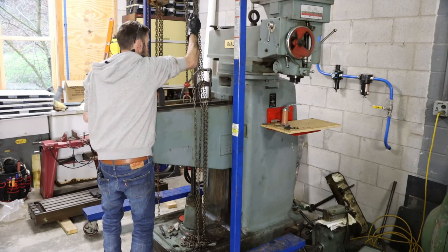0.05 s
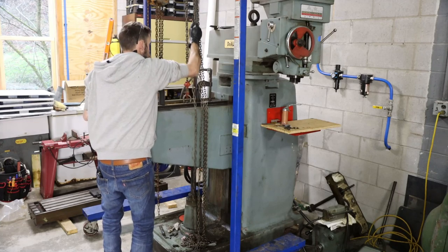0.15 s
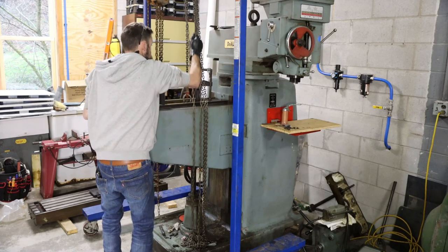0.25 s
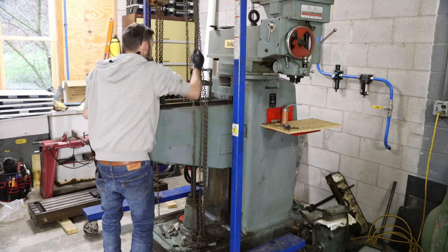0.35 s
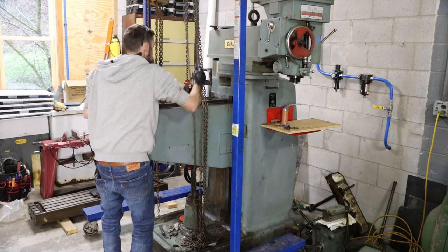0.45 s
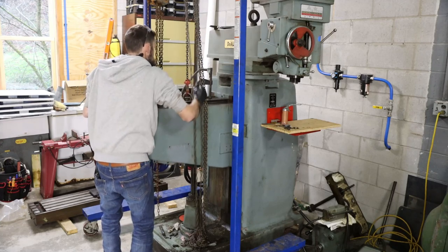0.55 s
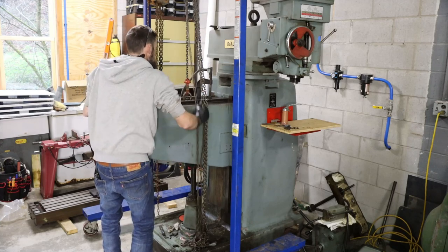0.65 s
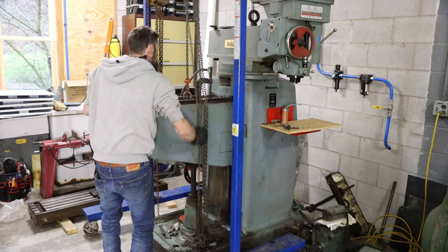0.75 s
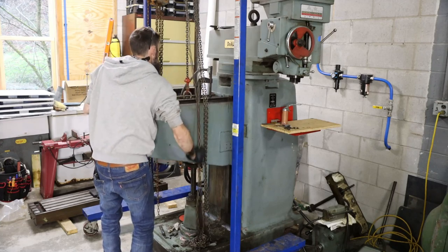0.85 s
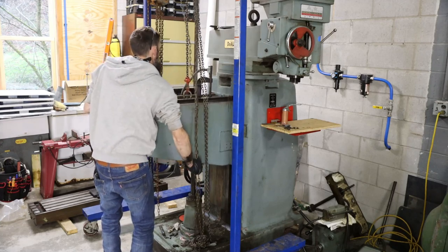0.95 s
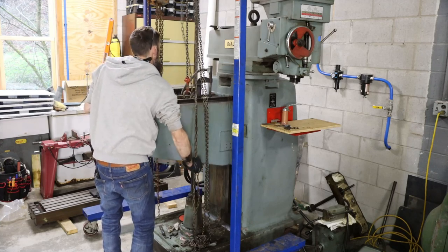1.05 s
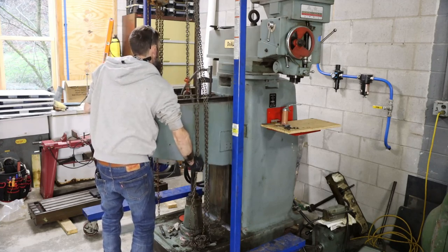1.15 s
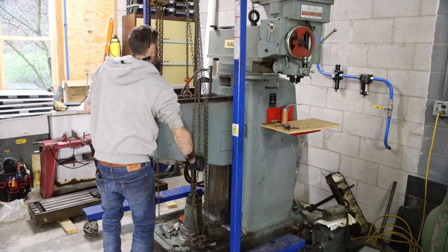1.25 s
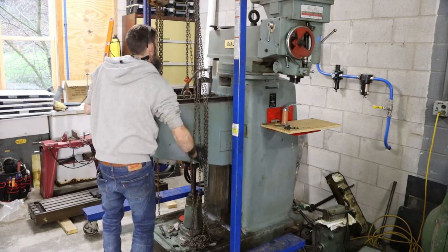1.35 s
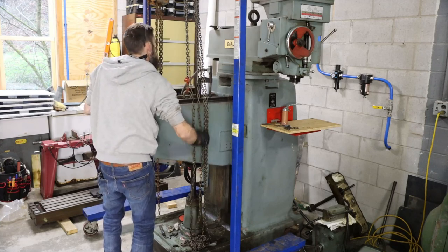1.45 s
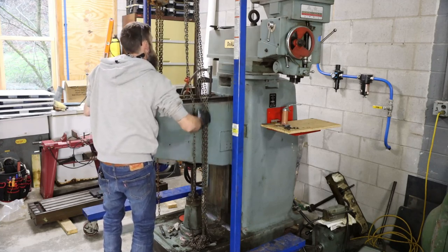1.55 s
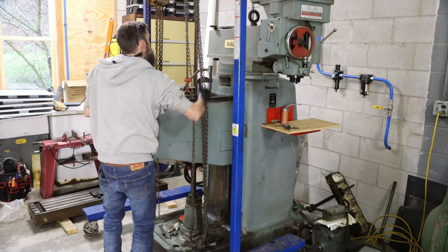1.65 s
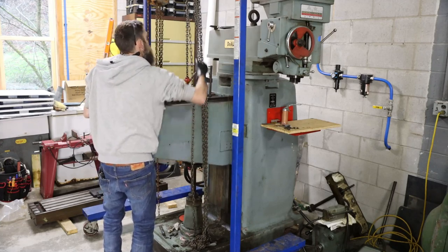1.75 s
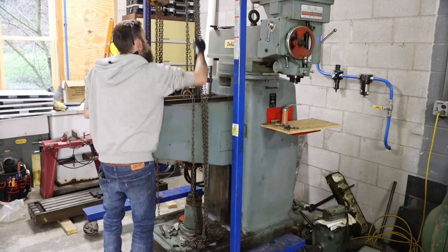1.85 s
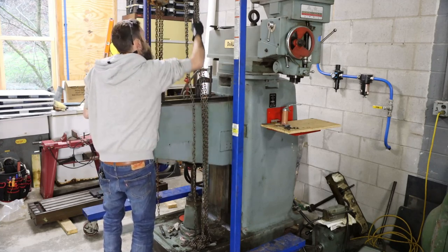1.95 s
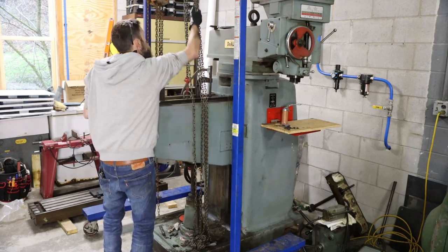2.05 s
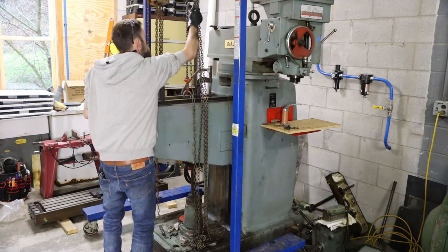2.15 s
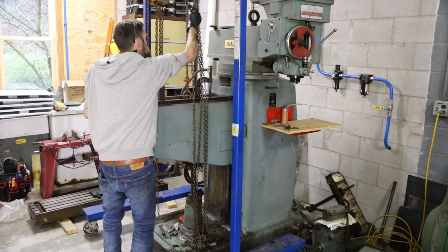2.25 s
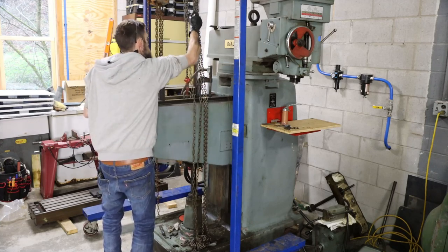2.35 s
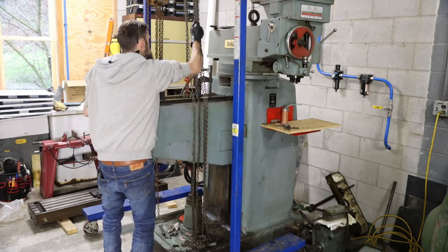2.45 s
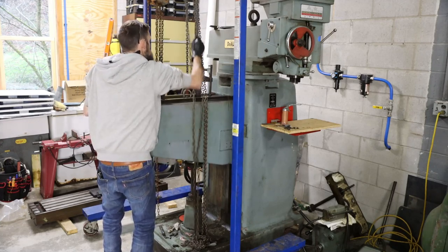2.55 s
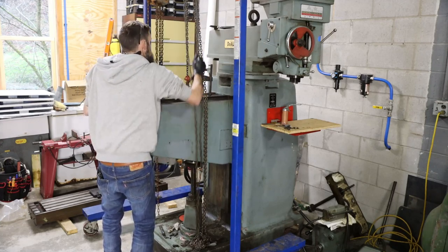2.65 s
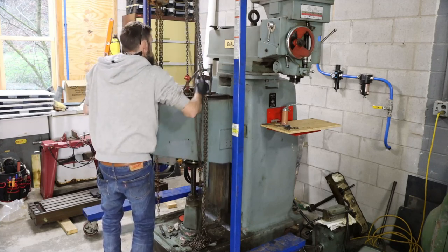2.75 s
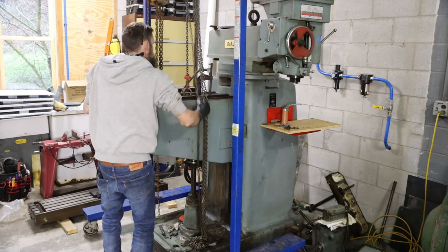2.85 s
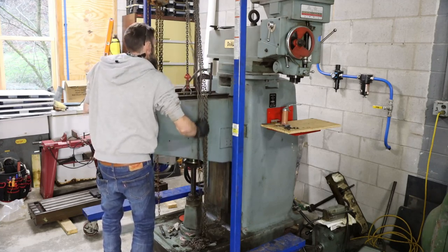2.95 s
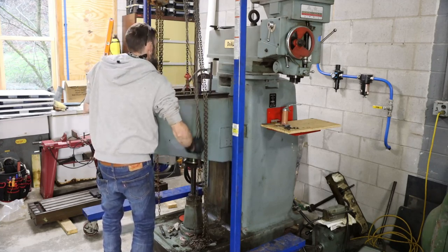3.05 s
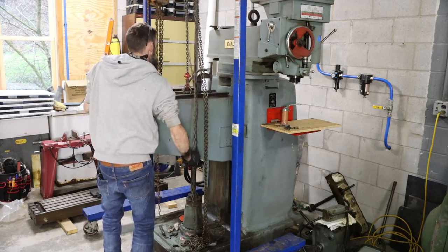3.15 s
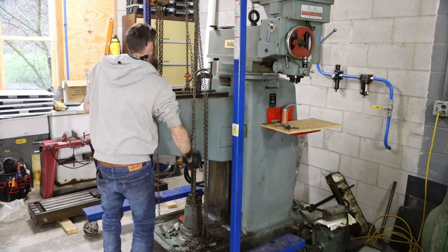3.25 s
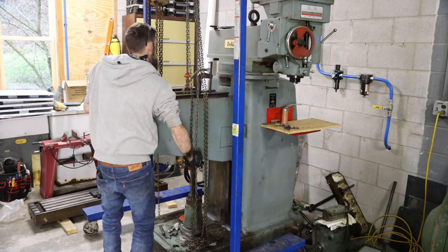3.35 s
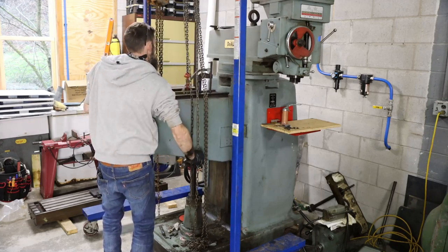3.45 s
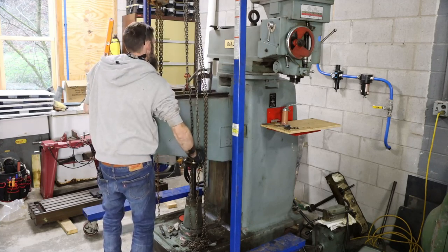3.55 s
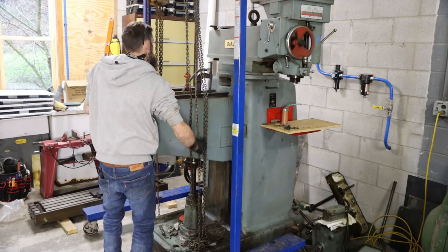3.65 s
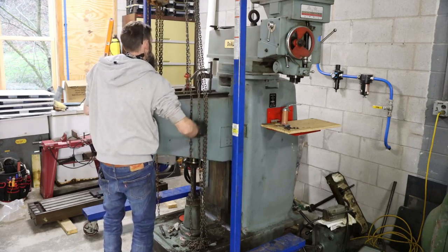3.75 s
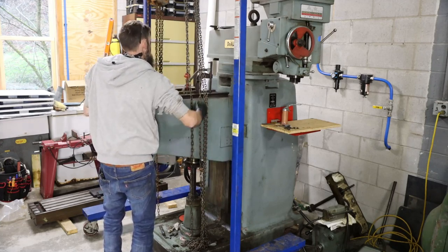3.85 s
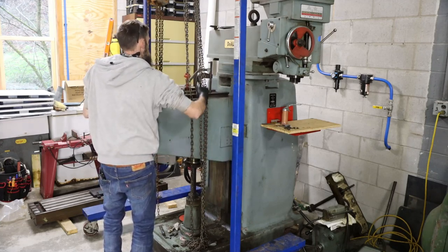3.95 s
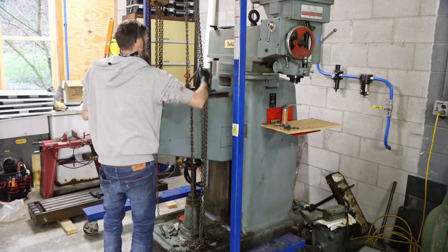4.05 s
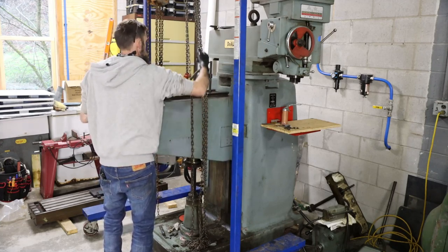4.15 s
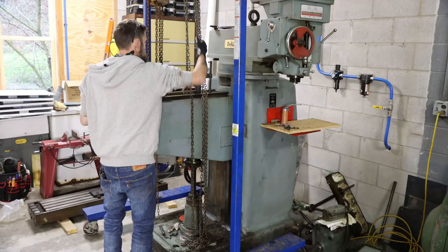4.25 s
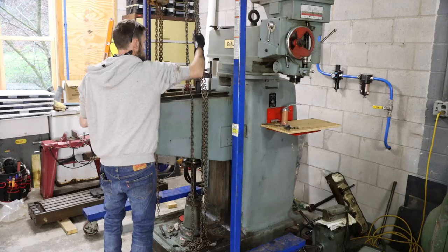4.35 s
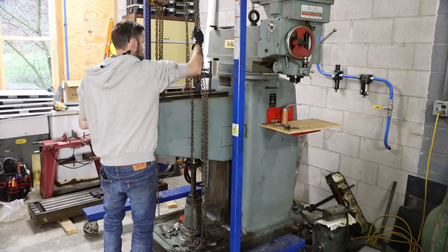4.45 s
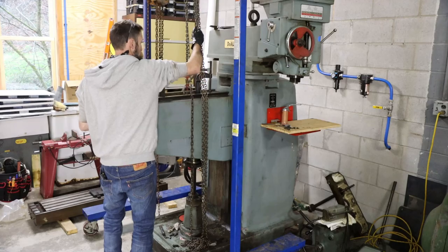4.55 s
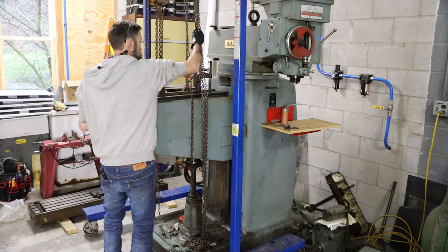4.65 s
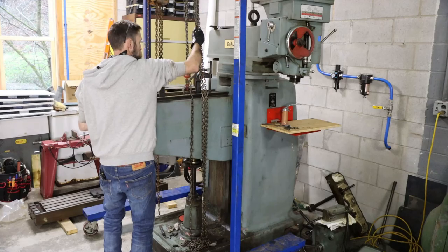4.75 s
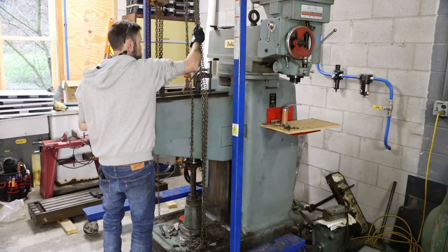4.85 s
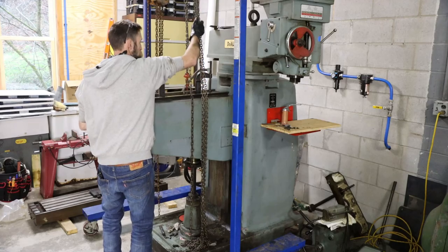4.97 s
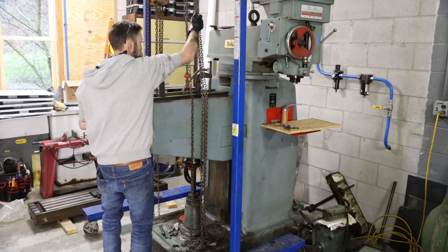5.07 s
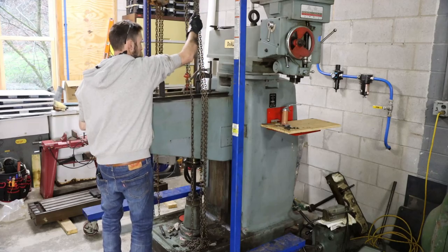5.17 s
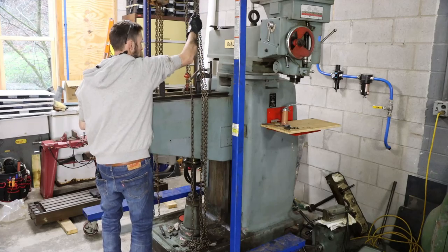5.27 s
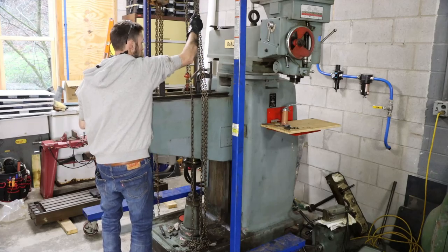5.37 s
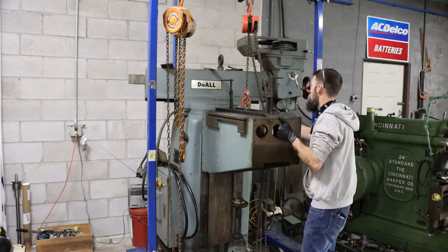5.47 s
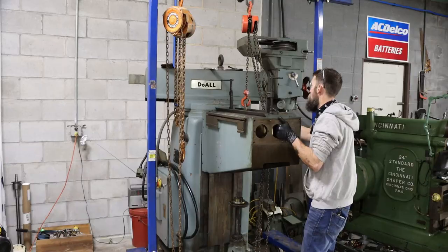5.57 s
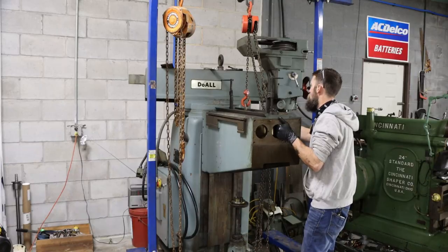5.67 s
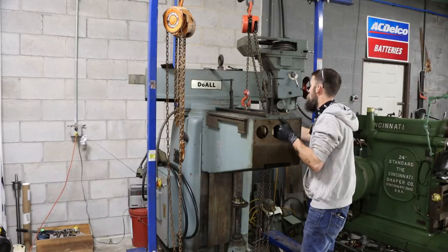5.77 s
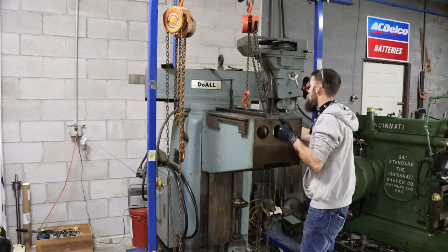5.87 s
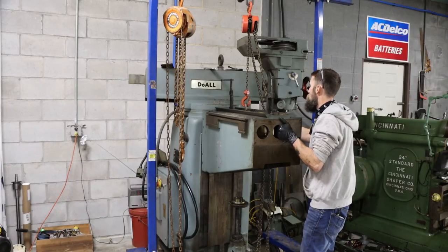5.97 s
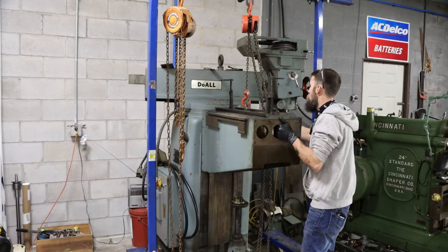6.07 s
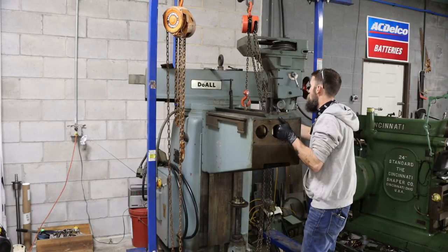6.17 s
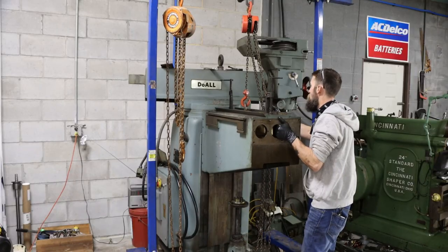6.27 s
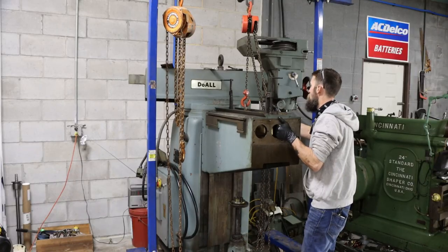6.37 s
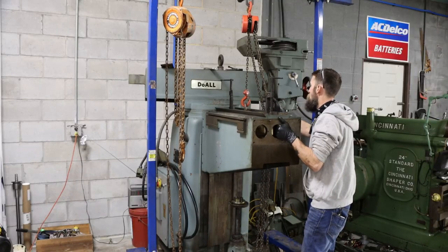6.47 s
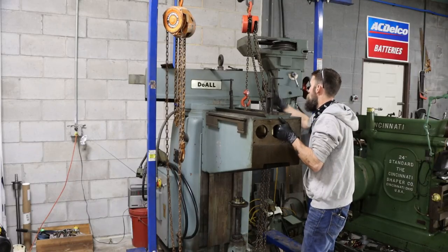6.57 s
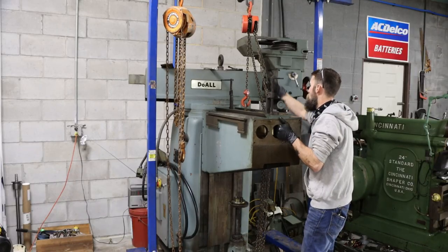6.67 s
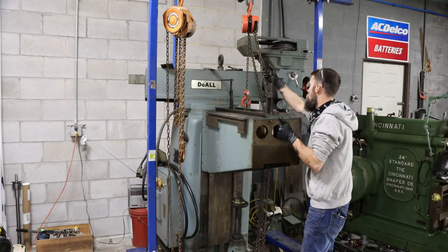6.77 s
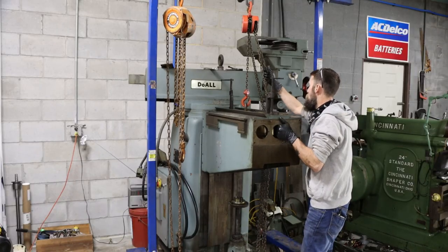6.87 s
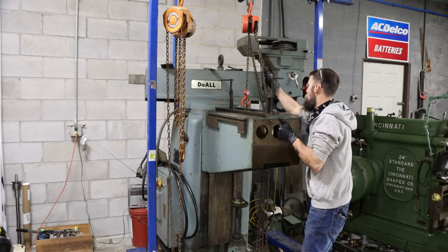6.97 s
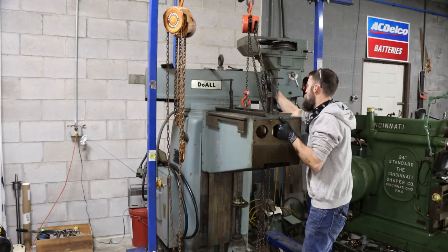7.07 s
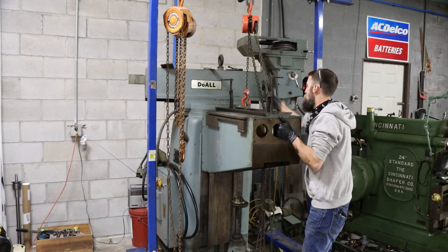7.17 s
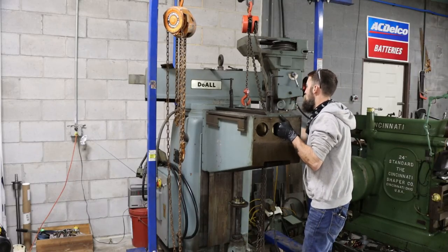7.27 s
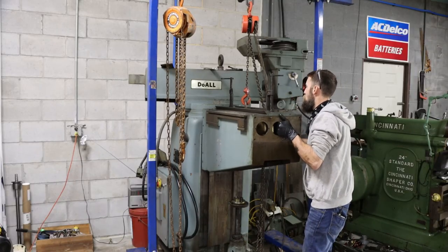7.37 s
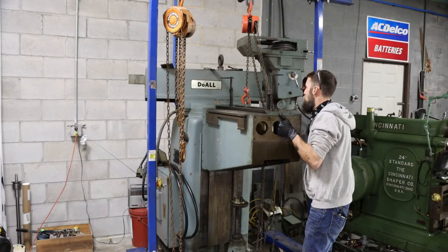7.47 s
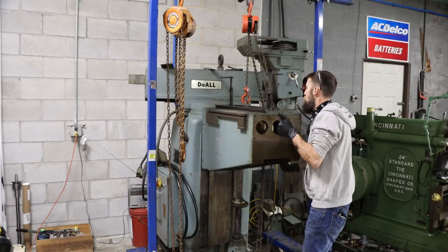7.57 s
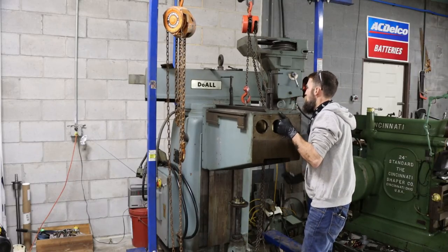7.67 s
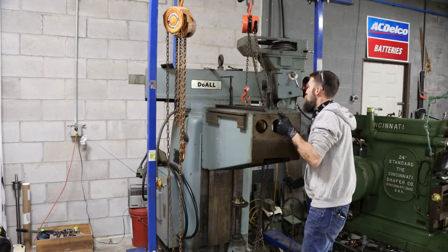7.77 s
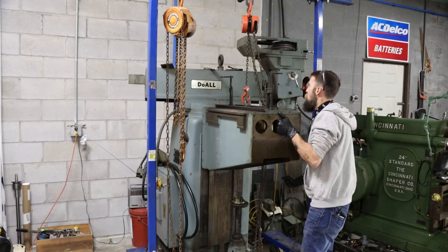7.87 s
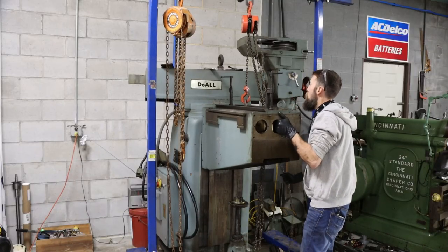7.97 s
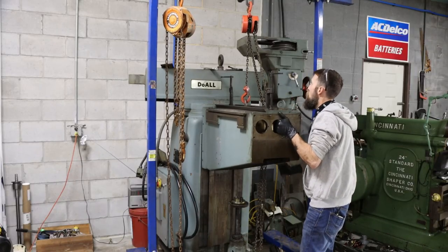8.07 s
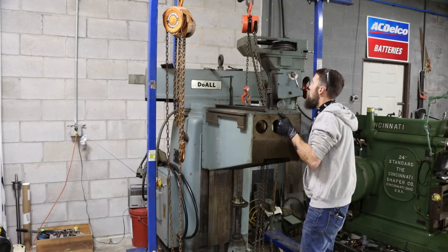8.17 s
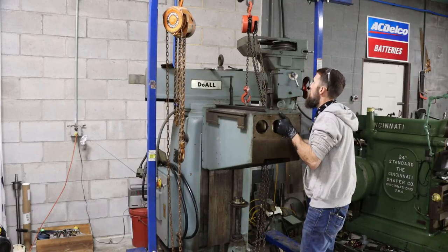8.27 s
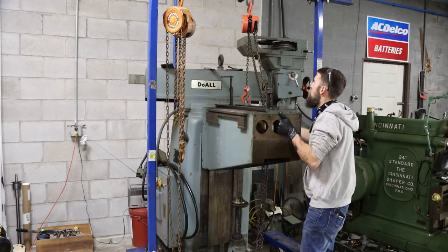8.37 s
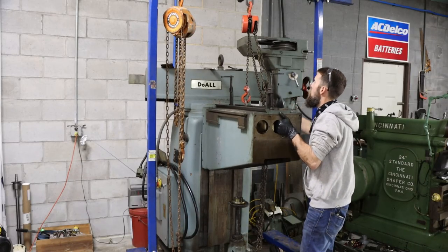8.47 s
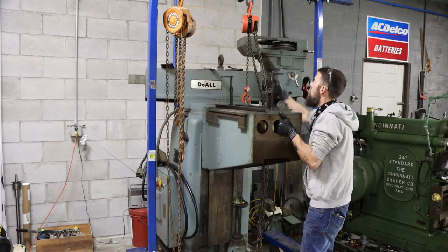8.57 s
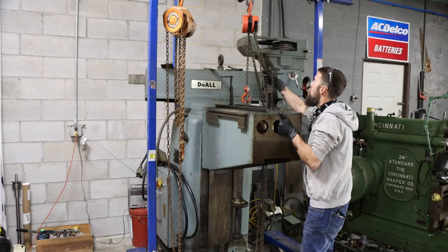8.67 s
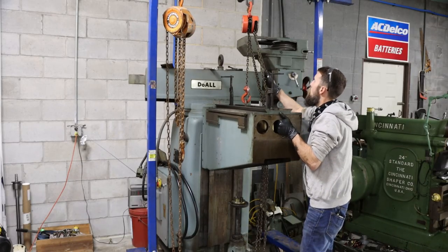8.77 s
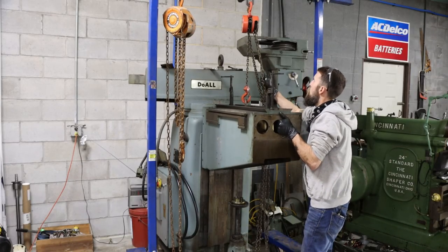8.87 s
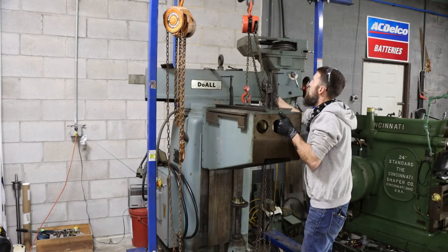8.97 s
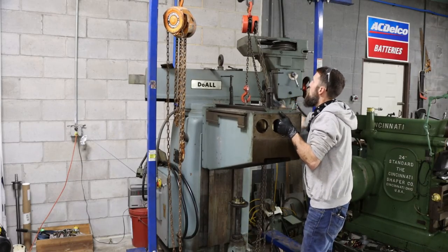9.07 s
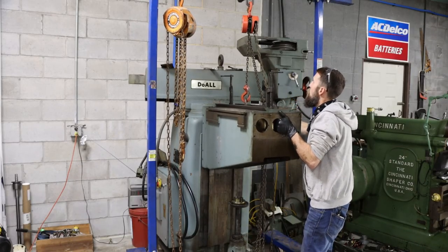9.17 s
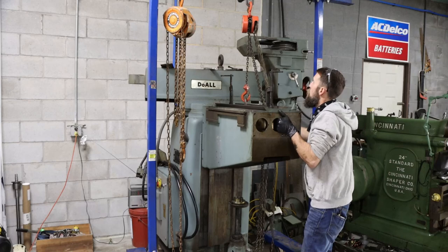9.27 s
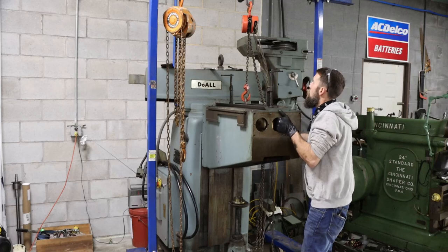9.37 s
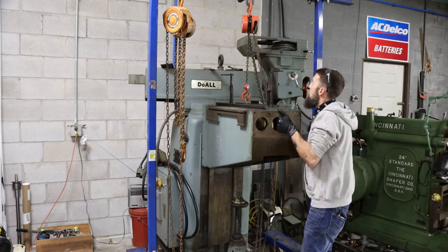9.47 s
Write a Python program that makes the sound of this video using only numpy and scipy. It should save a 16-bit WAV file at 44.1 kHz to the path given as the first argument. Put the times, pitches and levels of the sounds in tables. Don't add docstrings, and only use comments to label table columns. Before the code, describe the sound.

Close, bright steel chain noise in a hard-walled machine shop with a short echo. Two long bursts of ratcheting links speed up and slow down over a humming gear case and low beam groan. Leathery sliding, small clinks and iron knocks fill the gaps. A loud dull thud lands midway, a gentler one with a wavering ring follows, then a brief third rattle, heavier knocks, and a last uneven rattle still going at the end.

```python
import sys
import numpy as np
from scipy import signal
from scipy.fft import rfft, irfft
from scipy.io import wavfile
from scipy.ndimage import uniform_filter1d, map_coordinates

SR = 44100
rng = np.random.default_rng(int(sys.argv[2]) if len(sys.argv) > 2 else 0)


def transcribe(signal):
    frames = np.atleast_2d(signal).T
    limited = np.clip(frames, -1, 1)
    pcm = np.round(limited * 32767).astype(np.int16)
    wavfile.write(sys.argv[1], SR, pcm)


def elevation(decibels):
    levels = np.asarray(decibels, float)
    return 10 ** (levels / 20)


N = 419832
SIDE_VIEW_S = 5.47


def unit(x):
    return x / np.sqrt(np.mean(x ** 2))


def noise():
    return rng.standard_normal(N)


def spikes(times, db):
    out = np.zeros(N)
    index = np.minimum(np.asarray(times) * SR, N - 1).astype(int)
    np.add.at(out, index, elevation(np.asarray(db)))
    return out


def colour(x, points):
    size = 4096
    hz, db = np.transpose(points)
    bins = np.fft.rfftfreq(size, 1 / SR)
    log_gain = np.log(elevation(np.interp(np.log(bins + 1), np.log(hz), db)))
    cepstrum = irfft(log_gain)
    cepstrum[1:size // 2] *= 2
    cepstrum[size // 2 + 1:] = 0
    response = irfft(np.exp(rfft(cepstrum)))
    return signal.fftconvolve(x, response / np.sqrt(np.sum(response ** 2)))[:N]


def no_bass(x, hz):
    return signal.sosfilt(signal.butter(3, hz, "high", fs=SR, output="sos"), x)


def mode(x, hz, t60):
    r = np.exp(-np.log(1000) / (t60 * SR))
    w = 2 * np.pi * hz / SR
    return signal.lfilter([0, r * np.sin(w)], [1, -2 * r * np.cos(w), r * r], x)


def ring(x, modes):
    return sum(elevation(db) * mode(x, hz, t60) for hz, db, t60 in modes)


def resonate(x, peaks):
    out, power = 0, 0
    for hz, width, db in peaks:
        t60 = np.log(1000) / (np.pi * width)
        out = out + elevation(db) * 2 * np.pi * width / SR * mode(x, hz, t60)
        power += elevation(db) ** 2 * width * np.pi / SR
    return out / np.sqrt(power)


def contacts(times, db, decay_s):
    bite = np.exp(-1 / (0.00022 * SR))
    fade = np.exp(-1 / (decay_s * SR))
    return signal.lfilter([1 - bite], np.convolve([1, -bite], [1, -fade]), spikes(times, db))


def scrape(rows, decay_s):
    return contacts(*np.transpose(rows), decay_s) * noise()


def grains(count, spread_db, decay_s):
    when, size = rng.random((count, 2)).T
    level_db = -spread_db * np.log(1 - 0.975 * size)
    return unit(contacts(when * N / SR, level_db, decay_s) * noise())


def pings(times, db, hz, spread, rise_s, decay_s):
    out = np.zeros(N + SR)
    t = np.arange(SR // 10) / SR
    shape = (1 - np.exp(-t / rise_s)) * np.exp(-t / decay_s)
    shape = shape / shape.max()
    chance = rng.uniform(-1.044, 1, (len(times), 2))
    for s, gain, (tune, turn) in zip(times, elevation(np.asarray(db)), chance):
        start = int(s * SR)
        pitch = hz * (1 + spread * tune)
        out[start:start + len(t)] += gain * shape * np.sin(2 * np.pi * pitch * t + np.pi * turn)
    return out[:N]


# (frequency [Hz], level [dB])
AIR_SPECTRUM = [(15, -20), (25, 1.5), (157, 4), (503, 1.5), (754, 1.5), (1190, -13.5), (1290, -2),
                (1650, -12.5), (2480, -12.5), (13200, -24), (16000, -33.5)]


def still_air():
    side = np.arange(N) > SIDE_VIEW_S * SR
    return elevation(-56.5 - 2.5 * side) * colour(noise(), AIR_SPECTRUM)


def shop(x):
    low_t60_s, high_t60_s = 0.53, 0.13
    t = np.arange(SR) / SR
    a, b = rng.standard_normal((2, SR))
    low = 2.06 * signal.lfilter([0.2], [1, -0.8], a)
    tail = low * elevation(-60 * t / low_t60_s) + b * elevation(-60 * t / high_t60_s)
    tail = tail * np.clip(t / 0.0069 - 0.4, 0, 1)
    return elevation(-9) * signal.fftconvolve(x, tail / np.sqrt(np.sum(tail ** 2)))[:N]


# (time [s], level [dB])
BEAM_STRAIN = [
    (.32, -44),
    (2.62, -46.5),
    (3.5, -60),
    (9.05, -60),
]
# (frequency [Hz], width [Hz], level [dB])
BEAM_MODES = [(70.3, 40, -7), (142, 31, 10), (189, 50, -2)]


def gantry():
    t = np.arange(N) / SR
    strain_s = 0.15
    strain = sum(elevation(db - 9 * ((t - s) / strain_s) ** 2) for s, db in BEAM_STRAIN)
    return resonate(noise() * strain, BEAM_MODES)


# (loudest at [s], swell [s], fade [s], level [dB], top mode relative [dB])
GLOVE_SLIDES = [(1.1, 0.06, 0.17, -39.5, -25), (1.84, 0.32, 0.31, -39.5, -32),
                (3.38, 0.055, .2, -42, -24.5), (4.12, 0.36, 0.34, -41, -32),
                (4.551, 0.046, 0.22, -60.5, -23.5), (5.06, 0.13, 0.12, -49, -28),
                (5.579, 0.099, 0.098, -56, -18), (6.25, 0.16, 0.071, -57, -20.5),
                (6.68, 0.22, 0.23, -45, -36), (7.08, 0.035, 0.13, -50, -21),
                (7.98, 0.087, 0.63, -48.5, -19), (8.34, 0.028, 0.018, -45.5, 3.5),
                (8.5, 0.13, 0.26, -41, -25), (8.97, 0.041, 0.099, -48.5, -27)]


def slides():
    t = np.arange(N) / SR
    gain = []
    for s, swell, fade, db, _ in GLOVE_SLIDES:
        away = (t - s) / np.where(t < s, swell, fade)
        gain.append(elevation(db - 11.5 * away ** 2))
    gain = np.array(gain)
    return gain.sum(axis=0), elevation(np.array(GLOVE_SLIDES)[:, 4]) @ gain


# (frequency [Hz], level [dB])
GLOVE_SPECTRUM = [(880, -48.5), (1500, -0.5), (2610, 1.5), (3220, 3), (4690, 8), (6180, 5), (10000, 3.5),
                  (13900, -4.5), (16000, -9)]


def glove(hiss, top):
    held = np.repeat(rng.standard_normal(N // 400 + 1), 400)[:N]
    catch = uniform_filter1d(held, size=300)
    rub = elevation(0.5 + 1.2 * catch) * grains(count=20000, spread_db=5.0, decay_s=0.0043)
    return colour(hiss * rub, GLOVE_SPECTRUM) + resonate(top * rub, [(15200, 550, 0)])


# (frequency [Hz], width [Hz], level [dB])
CASE_BEHIND = [(393, 160, -2.5), (655, 60, -1.5), (840, 36, -4), (1045, 87, 2.5), (1327, 26, -8),
               (1609, 78, -1.5), (1915, 33, -13.5)]
# (frequency [Hz], width [Hz], level [dB])
CASE_SIDE = [(381, 50, 4), (698, 20, 8.5), (823, 59, 8.5), (1026, 250, 3.5), (1132, 144, 1), (1607, 35, 2),
             (2277, 68, -16)]


def housing(x):
    behind = np.arange(N) < SIDE_VIEW_S * SR
    return resonate(x * behind, CASE_BEHIND) + resonate(x * ~behind, CASE_SIDE)


# (time [s], peak [dB], link ring relative [dB])
LINK_TAPS = [(0.073, -40.5, 2.5), (1.1738, -25.5, 8.5), (1.2115, -42, 12), (1.5005, -48.5, 15),
             (1.5663, -27.5, -11), (2.0304, -36.5, 0), (2.108, -20.5, 3), (2.204, -26, 4),
             (2.273, -43, 11.5), (3.4415, -14.5, -4.5), (3.468, -11, -4), (5.492, -34.5, -1),
             (5.652, -35, 4), (5.9653, -42, -5), (5.997, -40.5, -10.5), (6.149, -40, -9),
             (6.192, -33, -9.5), (6.8103, -40.5, 2), (7.0285, -34, -20), (7.9193, -27.5, 9.5),
             (7.976, -12, -19), (8.0444, -19.5, -1.5), (8.088, -30, -3), (8.198, -23.5, -16),
             (8.8467, -48.5, 13.5), (8.9432, -34, -3),
             (0.1269, -41, 11), (0.176, -27.5, 10), (0.2079, -27, 12), (6.0155, -40, -15),
               (6.588, -41, 3), (7.074, -37, -4), (7.2558, -2.5, -3.5), (7.930, -22.5, 8),
               (7.995, -18.5, -14.5), (8.039, -33, 9.5), (8.082, -25, -7), (8.327, -24, -14),
               (8.9185, -42, -6), (8.974, -27.5, 0), (8.99, -29, -4)]
# (frequency [Hz], width [Hz], level [dB])
LINK_MODES = [(2973, 130, -1.5), (3306, 170, -2.5), (3890, 250, -4), (4846, 210, 2), (5160, 290, 2),
              (5850, 450, -1), (6260, 140, -5), (7950, 170, -6.5), (9100, 360, -15), (11400, 540, -23),
              (14880, 300, -24.5)]
# (frequency [Hz], level [dB])
TICK_SPECTRUM = [(1200, -44.5), (2400, -12), (4000, 1.5), (6000, -3.5), (8000, 5), (11600, 2.5),
                 (13500, -6), (16000, -10)]


def link_taps():
    s, db, ring_db = np.transpose(LINK_TAPS)
    click = colour(scrape([*zip(s, db)], 0.0056), TICK_SPECTRUM)
    blow = scrape([*zip(s, db + ring_db + 9.5)], 0.0041)
    return click + resonate(blow, LINK_MODES + [(6680, 180, 0.88)])


# (time [s], peak [dB], deep knock relative [dB])
IRON_KNOCKS = [(0.074, -22, -27), (1.174, -12.5, 1), (1.783, -22.5, -30), (1.992, -20.5, -39),
               (2.028, -23, -26), (2.107, -20, -26), (2.205, -17, -22.5), (2.274, -19, -17),
               (2.409, -21.5, -16), (3.465, -11.5, 3), (5.492, -31.5, -2.5), (5.531, -33, -17),
               (5.576, -26, -20), (5.65, -24, -28), (1.501, -22, -16), (5.968, -37.5, -5),
               (6.696, -28, -12), (6.798, -25.5, -2), (6.94, -25.5, -5), (6.959, -24.5, -5),
               (7.097, -24, -24), (7.2, -14, -39), (7.255, -9.5, -29.5), (7.668, -4, -17),
               (7.918, -17, 4.5), (8.045, -11, -18), (8.35, -27.5, -7), (8.558, -24, -22),
               (8.613, -22, -22), (8.842, -27.5, 5)]
# (time [s], level [dB])
STRAND_SWAY = [(0, -47), (1.15, -42), (1.38, -35.5), (1.64, -44), (1.95, -59), (2.44, -60), (3.35, -36),
               (4.2, -45), (4.7, -58.5), (5.45, -55.5), (5.6, -45), (6.1, -73), (6.6, -50), (7.1, -50),
               (7.9, -31), (8.3, -44.5), (8.62, -35), (9.0, -40.5)]
# (frequency [Hz], level [dB])
RUMBLE_SPECTRUM = [(25, -37), (150, -11), (260, -27), (340, -20.5), (700, 2.5), (1030, 7), (1380, -6.5),
                   (1640, 5.5), (2350, -7), (2970, -2), (4000, -11), (6000, -35)]


def strand_knocks():
    s, db, deep_db = np.transpose(IRON_KNOCKS)
    sway_db = np.interp(np.arange(N) / SR, *np.transpose(STRAND_SWAY))
    rub = elevation(sway_db) * grains(count=1500, spread_db=5.0, decay_s=0.017)
    blow = scrape([*zip(s, db)], 0.0049) + rub
    table = resonate(scrape([*zip(s, db + deep_db)], 0.0061),
                     [(380, 100, -2.0), (500, 170, -3.5), (643, 71, 2.0), (770, 110, -9.0)])
    return elevation(-6.0) * housing(blow) + elevation(-13.5) * colour(blow, RUMBLE_SPECTRUM) + elevation(-4.5) * table


def loose_chain():
    return no_bass(elevation(-10.0) * link_taps() + strand_knocks(), 514)


# (time [s], peak [dB], brightness [dB per octave])
FRAME_BLOWS = [
    (1.331, -26.5, 2.5),
    (1.802, -24.5, 0.5),
    (3.235, -21.5, -18.5),
    (3.459, -23, 8),
    (3.725, -21, 3),
    (4.003, -31, -0.5),
    (4.135, -39, 11.5),
    (4.797, -39, 0),
    (6.739, -31, 3),
    (6.444, -42, 0),
]
# (frequency [Hz], level [dB], t60 [s])
FRAME_MODES = [(571, 1.5, 0.36), (795, -21, 0.84), (1012, 0.5, 0.55), (1074, 6, 0.22), (1218, 1.5, 0.36),
               (1385, -6.5, 0.25), (1567, -4, 0.3), (1680, -3.5, 0.26), (1800, -12.5, 0.38),
               (2070, -10.5, 0.25), (2970, -17, 0.23)]
# (frequency [Hz], level [dB], t60 [s])
BRACKET_MODES = [(566.5, -42.5, 0.6), (1060, -48, 0.43), (1220, -43, 0.31), (1620, -49, .45),
                 (2080, -46, .08)]


def frame():
    s, db, bright = np.transpose(FRAME_BLOWS)
    rise = np.exp(-1 / (0.0071 * SR))
    rough = noise()

    def drag(level_db):
        return signal.lfilter([1 - rise], [1, -rise], contacts(s, level_db, 0.015)) * rough

    modes = elevation(-25.0) * ring(drag(db), FRAME_MODES)
    for hz, mode_db, t60 in FRAME_MODES:
        blow = spikes(s, db + mode_db + bright * np.log2(hz / 1000))
        modes = modes + mode(blow, hz, t60)
    modes = uniform_filter1d(modes, size=5)
    grating = resonate(drag(db + bright + 6), [(1130, 160, -11.5), (1770, 380, 4.0), (2730, 2100, 1.5)])
    tap = ring(spikes([4.797], [0]), BRACKET_MODES) + pings([4.138], [-36], 1680, 0, 0.0022, 0.028)
    return no_bass(elevation(-13.0) * modes + elevation(-11.0) * grating, 540) + tap


# (time [s], peak [dB])
LOAD_THUDS = [
    (4.215, -4),
    (6.2592, -12.5),
]
# (frequency [Hz], level [dB], t60 [s])
FIRST_THUD_MODES = [(174, -10, 0.67), (220, -0.5, 0.078), (238.5, -28.5, 1.73), (285, -16.5, 0.7),
                    (384, -24.5, 0.88), (560, -29, 1.3), (114, -19.5, 0.97), (673.8, -12, 0.89),
                    (862, -10, 0.13), (1134, -20, 0.36), (1380, -16, 0.4), (1698, -10, 0.16)]
# (frequency [Hz], level [dB], t60 [s])
SECOND_THUD_MODES = [(112.4, -7, 0.51), (210, -19, 0.76), (271.5, -16, 0.99), (333, -19, 0.92),
                     (384, -23.5, 0.82), (588, -16, 0.6), (1387, -18, 0.45)]
# (frequency [Hz], level [dB])
THUD_SPECTRUM = [(15, -40), (25, -1.5), (189, -8.5), (494, -16.5), (681, -17.5), (768, -22.5),
                 (1710, -38.5), (2300, -58), (6600, -110)]


def casting():
    out = 0
    for (s, db), modes in zip(LOAD_THUDS, (FIRST_THUD_MODES, SECOND_THUD_MODES)):
        envelope = contacts([s], [db - 17.0], 0.12) + contacts([s], [db - 8.5], 0.0086)
        shudder = envelope * noise()
        push = contacts([s], [db + 7.0], 0.00036) + elevation(-2.5) * shudder
        out = out + elevation(-35) * ring(push, modes) + colour(shudder, THUD_SPECTRUM)
    return no_bass(out, 112) + pings([LOAD_THUDS[0][0]], [-8.5], 190.3, 0, 0.0018, 0.011)


# (frequency [Hz], level [dB], t60 [s])
TWIN_MODES = [(675, -1, 2.0), (682.3, -1.4, 1.8)]


def throb():
    blow = spikes(*np.transpose(LOAD_THUDS[1:]))
    choke_db = 150 * (np.arange(N) / SR - LOAD_THUDS[1][0]) ** 2
    return elevation(-13.0 - choke_db) * (ring(blow, TWIN_MODES[:1]) - ring(blow, TWIN_MODES[1:]))


# (time [s], level [dB])
CASE_JOLTS = [(0.2155, -12.5), (0.2431, -17), (0.178, -14), (0.305, -32), (0.3622, -13), (0.3795, -13),
              (0.422, -14), (0.4983, -11), (0.5268, -15), (0.6217, -7.5), (0.662, -10), (0.7039, -15),
              (0.7389, -9.5), (0.841, -12.5), (0.9171, -19), (0.947, -13), (0.949, -17), (2.5376, -22),
              (2.56, -21), (2.7022, -11.5), (2.7278, -11.5), (2.7454, -10), (2.8116, -11.5), (2.8544, -7.5),
              (2.8725, -17), (2.8979, -7), (2.917, -16), (2.9776, -15), (3.022, -27), (3.0652, -14.5),
              (3.0787, -19), (3.0963, -17), (3.1622, -15), (3.2441, -25.5), (7.1999, -5), (7.2547, -12),
              (7.2965, -8.5), (7.318, -10), (7.4101, -11), (7.4735, -14), (7.488, -15), (7.5376, -26),
              (7.5726, -22), (7.6144, -10), (7.6497, -13), (7.667, -8.5), (7.683, -11), (7.7174, -18),
              (7.7518, -20), (9.008, -13.5), (9.0353, -17), (9.0945, -12.5), (9.1678, -17), (9.2349, -9.5),
              (9.2765, -13.5), (9.299, -20), (9.3377, -14), (9.4008, -14), (9.4386, -15), (9.4746, -16)]


def gear_case(rumble_db):
    shake = elevation(rumble_db - 6.5) * grains(count=2500, spread_db=4.0, decay_s=0.0051)
    shake = shake + elevation(-7.5) * no_bass(scrape(CASE_JOLTS, 0.0059), 280)
    case = elevation(-5.5) * housing(shake)
    case = case + elevation(-6.5) * pings(*np.transpose(CASE_JOLTS), 999, 0.12, 0.0013, 0.0076)
    return no_bass(case, 428) + elevation(0.87) * colour(shake, RUMBLE_SPECTRUM)


# (time [s], level [dB])
GUARD_SNAPS = [(0.6164, -9.5), (0.8312, -11), (0.949, -7.5), (2.5154, -4.5), (2.5378, -11), (2.5639, -12),
               (2.797, -9), (7.1995, -10.5), (7.2135, -11.5), (7.2629, -3), (7.3027, -15), (7.3354, -5.5),
               (7.3678, -11), (7.4575, -10), (7.4925, -10.5), (7.5229, -12), (7.5952, -16), (7.6674, -4.5),
               (7.7191, -12), (7.7662, -10), (9.034, -11.5), (9.2072, -13), (9.339, -11), (9.4562, -5.5)]


def guard_snaps():
    snaps = scrape(GUARD_SNAPS, 0.0032)
    return colour(snaps, TICK_SPECTRUM) + elevation(-5.0) * resonate(snaps, LINK_MODES[:3])


# (time [s], lower ring [dB], upper ring [dB])
FIRST_PULL_DROPS = [(0.228, -16.5, -28), (0.2525, -31, -28), (0.2815, -13, -2.5), (0.3053, -20.5, -27.5),
                    (0.3385, -23.5, -14), (0.3563, -12, -17.5), (0.3788, -11.5, -12), (0.394, -18.5, -5.5),
                    (0.41, -10, -14), (0.424, -7.5, -15.5), (0.445, -8.5, -6), (0.4578, -6.5, -11.5),
                    (0.481, -14, -15), (0.4989, -3, -6.5), (0.5242, -9, -19.5), (0.542, -9.5, -13.5),
                    (0.5675, -14.5, -8), (0.5802, -1, -11.5), (0.6062, -23, -10), (0.625, -13.5, -8.5),
                    (0.637, -18, -17), (0.6463, -13.5, -17.5), (0.66, -14, -6.5), (0.675, -14, -16),
                    (0.684, -18, -12), (0.701, -16, -1.5), (0.7154, -19, -17.5), (0.735, -15.5, -7.5),
                    (0.748, -16.5, -14), (0.757, -15, -16), (0.7688, -6, -9), (0.78, -11.5, -16),
                    (0.803, -12.5, -6.5), (0.823, -14, -16.5), (0.8534, -11, -17), (0.866, -4, -19.5),
                    (0.8899, -18.5, -13.5), (0.9026, 1, -14), (0.9238, -16, -9), (0.9376, -13, -15.5),
                    (0.954, -15.5, -23.5), (0.9632, -17.5, -10.5), (0.9957, -18, -8.5), (1.013, -12, -10)]
SECOND_PULL_DROPS = [(2.4528, -17, -28.5), (2.4867, -11, -24.5), (2.512, -7.5, -24.5), (2.537, -9.5, -20),
                     (2.5587, -15.5, -22), (2.592, -10, -22), (2.619, -23.5, -23), (2.64, -22, -21),
                     (2.664, -13, -9.5), (2.6844, -15.5, -16), (2.7044, -18, -13), (2.716, -18.5, -21),
                     (2.7251, -22, -16), (2.7427, -10, -16.5), (2.762, -15, -18), (2.779, -4, -13.5),
                     (2.796, -12, -13.5), (2.814, -8.5, -17.5), (2.8211, -14, -13.5), (2.8307, -13, -21),
                     (2.8478, -11.5, -20), (2.857, -4.5, -16.5), (2.88, -11.5, -17.5), (2.892, -11, -18.5),
                     (2.9006, -13.5, -18.5), (2.912, -5.5, -15.5), (2.9252, -21.5, -22.5),
                     (2.939, -12.5, -13.5), (2.9504, -7, -16.5), (2.979, -17, -15.5), (3.0003, -24.5, -21),
                     (3.018, -19.5, -14.5), (3.027, -20, -18), (3.0745, -6, -8.5), (3.0865, -12.5, -15),
                     (3.113, -23.5, -13), (3.136, -21.5, -11.5), (3.1497, -21, -18), (3.182, -14.5, -16),
                     (3.2003, -15, -7), (3.2102, -16, -18.5), (3.238, -25.5, -16.5)]
THIRD_PULL_DROPS = [(7.1988, -5, -18), (7.2144, -20, -18), (7.2332, -16, -19), (7.263, -14, -3),
                    (7.2796, -24, -12), (7.2861, -14, -21), (7.2968, -10, -21), (7.316, -11, -16),
                    (7.3351, -23, -9), (7.3505, -8, -13.5), (7.3666, -8.5, -13), (7.3798, -20, -12),
                    (7.389, -4.5, -5), (7.4114, -9, -10.5), (7.4358, -10, -16), (7.4643, -19, -19),
                    (7.4742, -5, -13), (7.4924, -11.5, -7), (7.5048, -12, -14.5), (7.5238, -20.5, -9),
                    (7.5391, -12, -20), (7.5529, -33, -25), (7.5862, -3, -13.5), (7.6095, -7, -6),
                    (7.622, -14.5, -23.5), (7.6507, -15.5, -15), (7.6604, -13, -18), (7.6687, -17, -13.5),
                    (7.6953, -35, -11.5), (7.7198, -15.5, -11), (7.7557, -12, -22), (7.7662, -9, -7),
                    (7.8066, -17, -25)]
LAST_PULL_DROPS = [(9.0047, -19.5, -34), (9.0373, -15, -35), (9.0523, -22, -30), (9.0825, -22, -29),
                   (9.1098, -14.5, -26), (9.165, -13, -19), (9.1839, -10, -8), (9.2093, -24, -22),
                   (9.2266, -15, -29.5), (9.2382, -10, -21), (9.2471, -11, -23), (9.2998, -5, -22),
                   (9.3173, -15, -28.5), (9.3426, -16, -25), (9.358, -19, -33), (9.38, -13, -21),
                   (9.3902, -16, -19), (9.411, -10, -19.5), (9.436, -14.5, -19), (9.4565, -18, -20),
                   (9.4734, -9, -13), (9.481, -9, -8), (9.4923, -18, -20)]


def pocket_drops():
    s, low_db, high_db = np.transpose(FIRST_PULL_DROPS + SECOND_PULL_DROPS + THIRD_PULL_DROPS + LAST_PULL_DROPS)
    low = pings(s, low_db - 3.0, 4950, 0.048, 0.0012, 0.0041)
    high = pings(s, high_db, 5880, 0.035, 0.00092, 0.0021)
    return low + high + elevation(-5.0) * resonate(scrape([*zip(s, low_db)], 0.0027), LINK_MODES)


# (time [s], speed [teeth per s])
WHEEL_SPEED = [
    [(0.146, 21.1), (0.261, 35.7), (0.382, 55.2), (0.552, 62.5), (0.75, 77.0), (0.92, 80.1), (1.068, 28.2)],
    [(2.452, 27.0), (2.539, 40.0), (2.641, 63.0), (2.782, 74.4), (2.947, 80.7), (3.12, 65.4), (3.276, 34.4)],
    [(7.15, 21.8), (7.222, 41.2), (7.301, 57.4), (7.425, 63.6), (7.559, 80.0), (7.705, 56.6), (7.812, 51.5)],
    [(9.006, 17.0), (9.056, 31.0), (9.098, 30.4), (9.2, 51.1), (9.318, 40.1), (9.45, 46.0), (9.51, 63.9)],
]
# (pawl [dB], link clatter at full speed [dB], housing rumble [dB], hand eases off at [s],
# dying away [dB per s])
PULL_LEVELS = [
    (-7, -9, -21, 1.022, 187.5),
    (-6, -9.5, -21, 3.257, 205),
    (-7.5, -10, -20, 7.763, 83),
    (-6.5, -9.5, -21.5, 9.6, 150),
]


def pulls():
    full_teeth_s, clatter_power = 68.6, 0.81
    take_up_s = 0.03
    lag_high_ms, lag_low_ms = 0.86, 0.43
    t = np.arange(N) / SR
    teeth, link, rumble, lag = [], 1e-9, 1e-9, np.full(N, lag_high_ms)
    for speed, (pawl_db, link_db, housing_db, ease, fall) in zip(WHEEL_SPEED, PULL_LEVELS):
        s, rate = np.transpose(speed)
        rate = np.interp(t, s, rate)
        turned = np.cumsum(rate * (t >= s[0]) * (t <= s[-1])) / SR
        count = np.arange(1, turned[-1] + 0.3)
        when = np.r_[s[0], np.interp(count, np.minimum(turned, turned[-1]), t)]
        teeth += [(min(w, s[-1]), pawl_db - fall * max(w - ease, 0) / 2) for w in when]
        early = np.maximum(s[0] + take_up_s - t, 0)
        late = np.maximum(t - ease, 0)
        link_gain = elevation(link_db - 299.5 * early - fall * late)
        link = link + link_gain * (rate / full_teeth_s) ** clatter_power
        rumble = rumble + elevation(housing_db - 188 * early - fall * late)
        sweep = lag_high_ms + (lag_low_ms - lag_high_ms) * turned / turned[-1]
        lag = np.where(t >= s[0], sweep, lag)
    return np.array(teeth), 20 * np.log10(link), 20 * np.log10(rumble), lag


def arm_echo(steel, lag_ms):
    behind = np.arange(N) < SIDE_VIEW_S * SR
    return elevation(-11) * behind * map_coordinates(steel, [np.arange(N) - lag_ms * SR / 1000], order=3)


def hoist(teeth, link_db, rumble_db, lag_ms):
    scatter = [0.0005, 2.2]  # s, dB
    pawl = teeth + rng.standard_normal((len(teeth), 2)) * scatter
    ticks = elevation(-6.5) * scrape(pawl, 0.0047)
    clatter = elevation(link_db - 12.0) * grains(count=2000, spread_db=0.0, decay_s=0.0026)
    jingle = elevation(link_db - 18.0) * grains(count=6000, spread_db=6.5, decay_s=0.0081)
    steel = resonate(clatter, LINK_MODES) + colour(ticks + jingle, TICK_SPECTRUM)
    steel = steel + guard_snaps() + pocket_drops()
    steel = steel + arm_echo(steel, lag_ms)
    return no_bass(steel, 428) + gear_case(rumble_db)


def scene():
    chain = hoist(*pulls()) + loose_chain()
    chain = 0.49 * chain + 0.5 * signal.lfilter(*signal.iirnotch(2400, 3.0, SR), chain)
    near = chain + frame() + glove(*slides()) + casting()
    mix = near + shop(near) + throb() + gantry() + still_air()
    return mix[None]


def low_pass(x):
    return signal.sosfilt(signal.butter(12, 16320, fs=SR, output="sos"), x)


def record(dry):
    limited = np.tanh(1.1 * dry) / 1.1
    limited = signal.sosfilt(signal.ellip(8, 0.2, 60, 15800, fs=SR, output="sos"), limited)
    return low_pass(limited)


dry = scene()
out = record(dry)
transcribe(out)
```